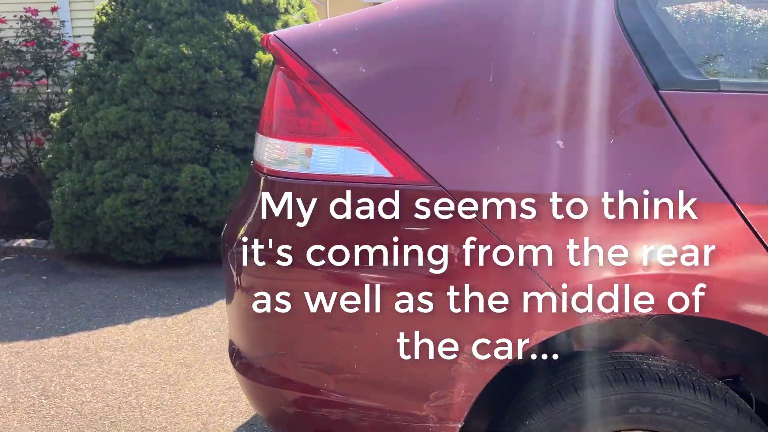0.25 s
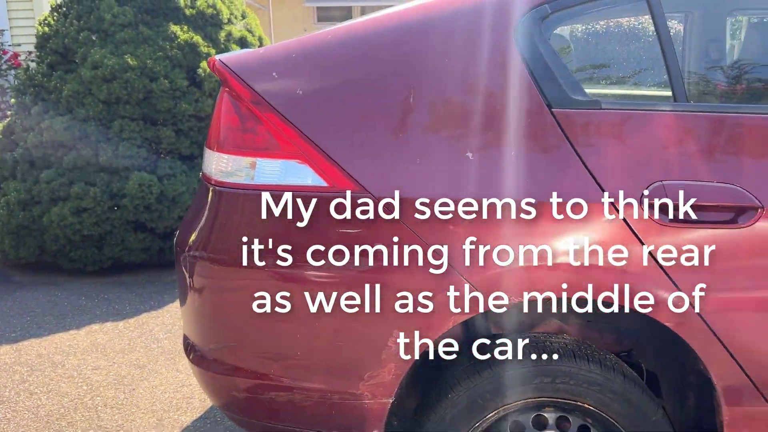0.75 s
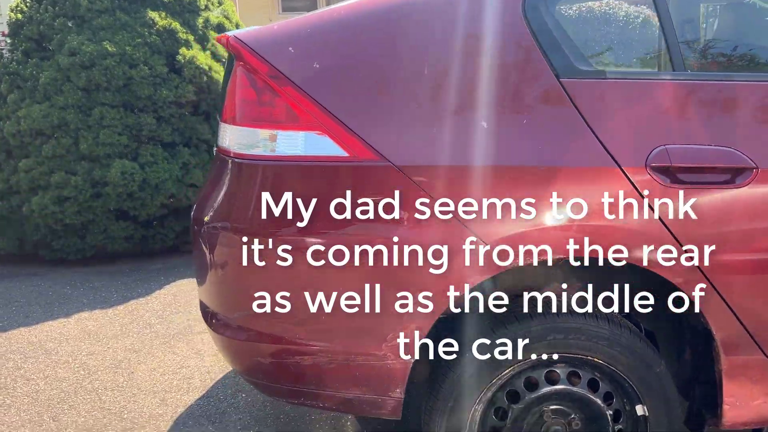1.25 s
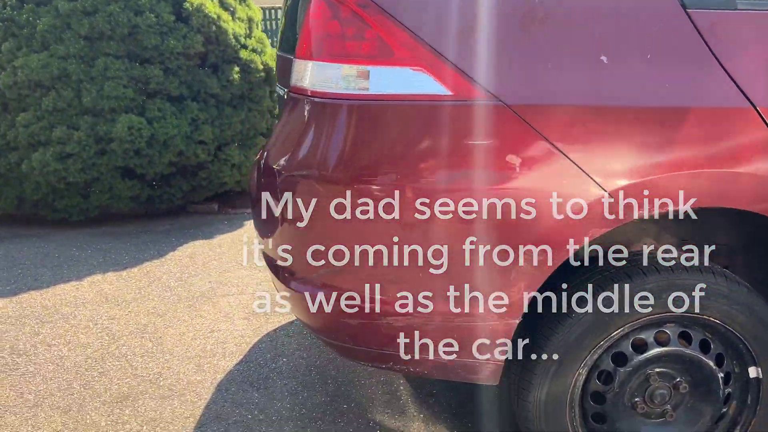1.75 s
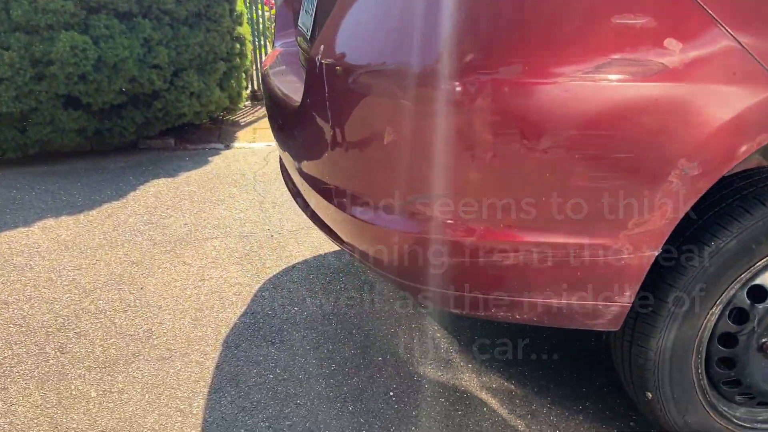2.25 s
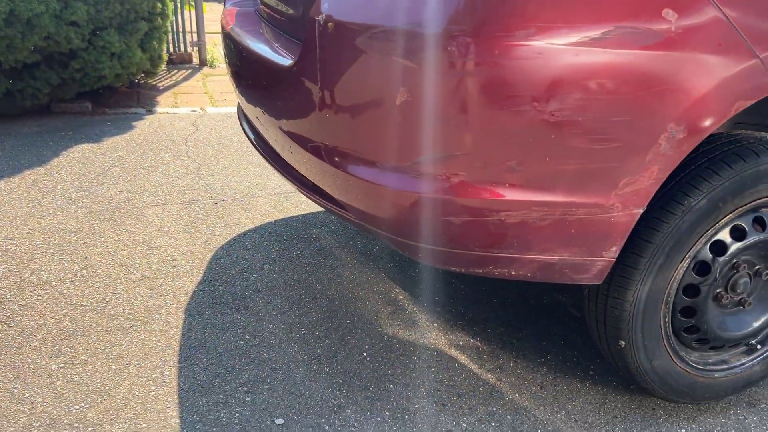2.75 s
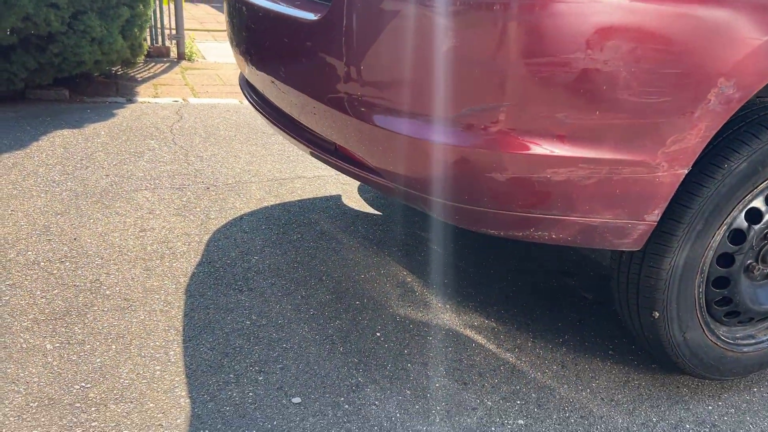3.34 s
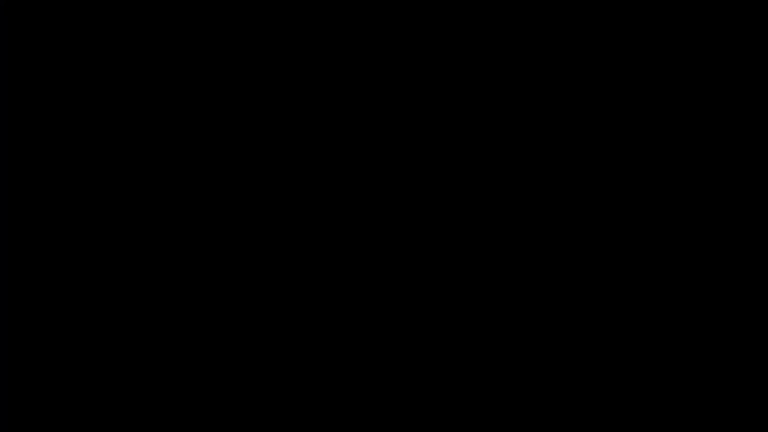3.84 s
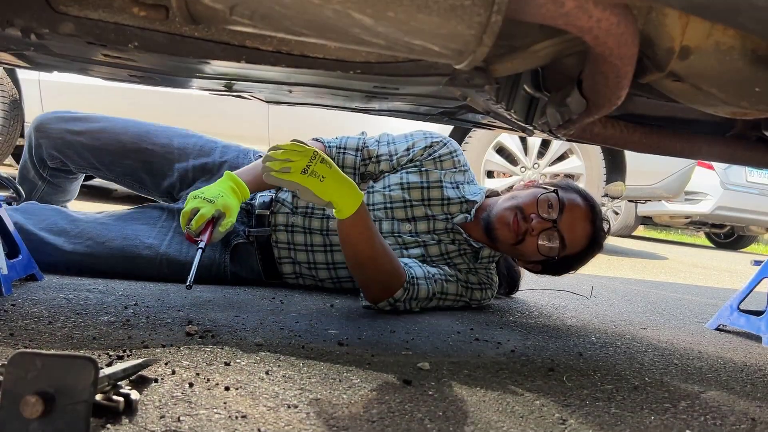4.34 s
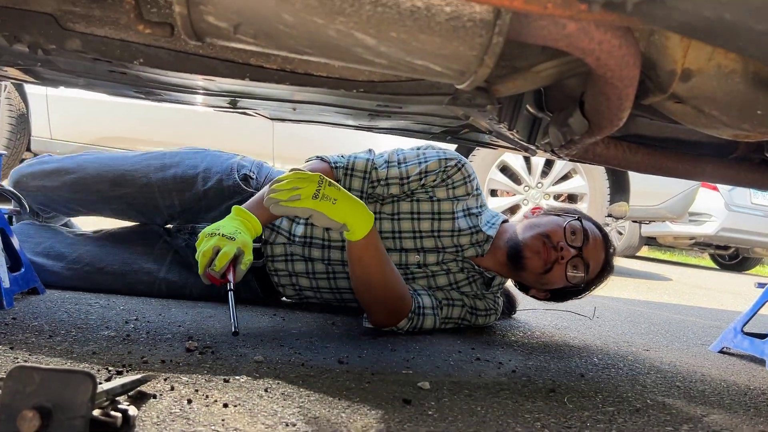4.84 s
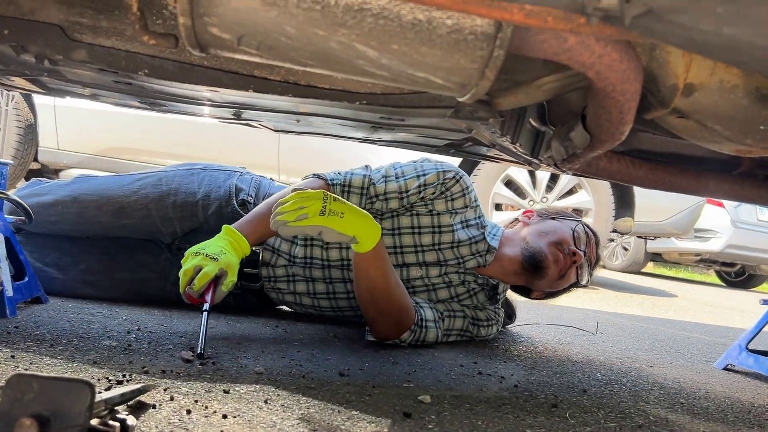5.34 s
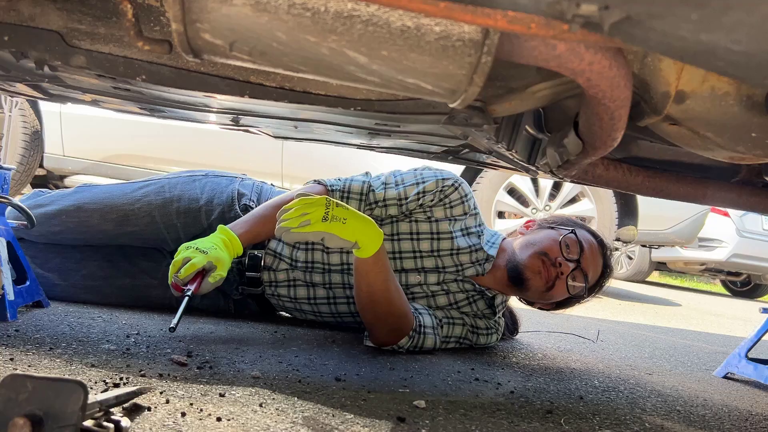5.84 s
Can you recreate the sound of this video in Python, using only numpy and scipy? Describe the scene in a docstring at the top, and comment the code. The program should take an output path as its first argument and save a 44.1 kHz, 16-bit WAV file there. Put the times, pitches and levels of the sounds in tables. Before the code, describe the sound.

A small car idles with a booming, hissing exhaust leak, fades out, then fades back in closer with a harder, ticking bark.

```python
"""First comes the round boom of a small car idling with a leaking exhaust, heard beside the rear bumper.
Every firing sends a pressure pulse down the pipe: it spits hiss and a crack through the leak, then booms
and puffs out of the tailpipe. Light wind brushes the microphone and grit scuffs on the driveway.
The listener stoops as the sound fades out; then the idle fades in from under the floor,
slower and harder, with a sharp tick on every firing."""
import sys
import numpy as np
from scipy import signal
from scipy.fft import rfft, irfft
from scipy.io import wavfile

SR = 44100
rng = np.random.default_rng(int(sys.argv[2]) if len(sys.argv) > 2 else 0)


def unload_wav(signal):
    """Save mono or channel-first audio to the path in sys.argv[1] as 16-bit WAV at rate SR, clipped to [-1, 1]."""
    wavfile.write(
        sys.argv[1],
        SR,
        np.round(np.clip(np.atleast_2d(signal).T, -1, 1) * 32767).astype(np.int16),
    )


N = 268304

# the pipe's tone from each listening place: (multiple of the firing rate, level/dB)
STANDING_PIPE = [(1, -27), (2, -0.5), (3, -0.7), (4, 3), (5, -1.5), (6, -21.5), (7, -15.5), (8, -14),
                 (9, -21.5), (10, -25), (11, -15.5), (12, -32.5), (13, -20.5), (14, -40.5), (15, -35),
                 (16, -42), (17, -39), (18, -46)]
STOOPED_PIPE = [(1, -24), (2, 2), (3, 0), (4, -2.5), (5, -1.5), (6, -30), (7, -24.5), (8, -16.5), (9, -21),
                (10, -28), (11, -14), (12, -48.5), (13, -26.5), (14, -35), (15, -24), (16, -23), (17, -35),
                (18, -24), (19, -36.5), (20, -39), (21, -38.5), (22, -35), (23, -51)]
UNDER_PIPE = [(1, -19), (2, 6), (3, 8.5), (4, -0.5), (5, 4), (6, -17.5), (7, -14.5), (8, -7), (9, -19),
              (10, -22), (11, -17), (12, -30.5), (13, -10.5), (14, -26), (15, -30.5), (16, -25.5),
              (17, -22), (18, -30), (19, -43), (20, -43.5)]
# the knock by which every other firing differs: (multiple of the firing rate, level/dB)
REAR_LOPE = [(5, -36), (7.5, -32), (9.5, -23.5), (10.5, -19.5), (11.5, -27), (12.5, -35), (14.5, -35),
             (17.5, -37), (21, -49)]
UNDER_LOPE = [(5.5, -38), (7.5, -26), (8.5, -22.5), (12.5, -24), (14.5, -29), (15.5, -37), (16.5, -35.5),
              (18, -45), (20.5, -42)]
# the four cylinders hit a little unevenly: level/dB of each
CYLINDER_DB = [-1.7, -2.1, -1.73, -2.1]
# tailpipe and underbody resonances rung by the puffs: (f/Hz, width/Hz, level/dB)
STANDING_RINGS = [(763, 115, -5.5), (906, 60, 2), (946, 23, 6), (1135, 45, -0.5), (1440, 61, -12.5),
                  (1773, 20, -6), (2025, 91, -7.5), (2550, 100, -18.5)]
STOOPED_RINGS = [(718, 75, 3.5), (937, 44, 5.5), (1121, 21, 0.5), (1260, 81, -4), (1500, 114, -4.5),
                 (1900, 190, -8.5), (2410, 150, -11.5)]
UNDER_RINGS = [(641.5, 18, 3.5), (907, 55, -8), (1254, 52, 0), (1403, 63, -7), (1608, 37, -5.5),
               (1847, 49, -5.5), (2136, 28, -3.5), (2350, 130, -11), (2650, 85, -10.5), (2870, 27, -11)]
# the gap between floor and ground throws each crack sideways: (f/Hz, width/Hz, level/dB)
GAP_RINGS = [(1140, 440, -11), (1800, 100, 9)]
# EQ curves of churning gas, leak hiss, wind and grit: (f/Hz, level/dB)
REAR_CHURN = [(40, -25), (70, -16), (150, -0.5), (220, 5.5), (380, 6), (520, 3), (750, -8), (1200, -100)]
UNDER_CHURN = [(40, -36), (70, -23), (150, -3), (250, 8.5), (400, -4.5), (550, 3.5), (750, -28),
               (1200, -73)]
REAR_HISS = [(400, -10), (900, 4), (1500, 6), (3000, 5), (4500, 0), (7000, -3), (14000, -4.5), (15800, -11)]
UNDER_HISS = [(500, -18), (1000, -2), (2400, 4.5), (4500, 0), (6500, -3), (13500, -2.5), (15800, -8)]
WIND_COLOUR = [(15, -47), (28, 13), (42, 10), (60, 21.5), (90, 17), (160, 12.5), (400, -37.5)]
SCUFF_COLOUR = [(700, -8), (1700, 3), (4200, 4), (5800, -2), (7800, 1), (13500, -9), (16000, -22)]
# buffets of wind and scuffs on the asphalt: (t/s, level/dB, rise and decay time/s)
BUFFETS = [(.21, -32, 0.03), (.37, -28, 0.098), (.61, -26.5, 0.048), (1.28, -30, 0.073), (1.44, -28, 0.036),
           (1.66, -34, 0.049), (1.9, -34, 0.14)]
SCUFFS = [(.668, -46.5, 0.039), (1.11, -45.5, 0.037), (2.781, -42, .012), (2.8005, -32.5, 0.00076),
          (2.821, -40, 0.0059), (2.8465, -34.5, 0.00064), (2.8475, -37, 0.0093), (2.863, -44, 0.012)]
# stereo image of the noise: (f/Hz, left-right correlation)
STEREO_LIKENESS = [(60, 0.85), (200, 0.95), (400, 0.35), (700, 0.11), (1300, 0.47), (2500, 0.24),
                   (6000, -0.032), (8600, 0.4), (12500, -0.022)]

# the mix at each listening place: level/dB of (boom, bark, puff, hiss)
STANDING_DB = (-19.5, -27.5, -40, -45.5)
STOOPED_DB = (-18, -26, -42.5, -46.5)
UNDER_DB = (-14.5, -23, -40, -40)
RAISED_DB_PER_HZ = (0.039, 1.6, -1.5, 0.15)   # shift of that mix per extra firing per second
STOOP_S = (1.62, 2)   # start and end of the listener's move down


def beside_bumper():
    """The exhaust near the tailpipe: round boom and soft puffs, the leak farther off."""
    stoop = ramp(*STOOP_S)
    raised_hz = 1.91 * np.exp(-(seconds() / .4702) ** 1.738)   # the engine settles from a raised speed
    firing_hz = 34.939 - .1909 * seconds() + raised_hz   # into a slowly sagging idle
    boom_db, bark_db, puff_db, hiss_db = [
        (1 - stoop) * standing_db + stoop * stooped_db + slope * raised_hz
        for standing_db, stooped_db, slope in zip(STANDING_DB, STOOPED_DB, RAISED_DB_PER_HZ)]
    clicks = firings(firing_hz, first_s=.0162, uneven_db=.35, jitter_s=.00005)
    standing_fronts = rebound(clicks, trip_s=.0052, share=.85, travel_s=.0059)
    stooped_fronts = rebound(clicks, trip_s=.0022, share=.51, travel_s=.0062)
    lope_fronts = rebound(every_other(clicks), trip_s=.007, share=.64, travel_s=.00907)
    standing = pipe_pulses(standing_fronts, STANDING_PIPE, base_hz=35.25, scatter_db=-5.5)
    stooped = pipe_pulses(stooped_fronts, STOOPED_PIPE, base_hz=34.45, scatter_db=-4)
    lope = pipe_pulses(lope_fronts, REAR_LOPE, base_hz=33.85, scatter_db=-4.5)
    pulses = (1 - stoop) * standing + stoop * stooped + lope
    note = exhaust_note(pulses, boom_db, bark_db, split_hz=162.3)
    puffing = gas_flow(clicks, rise_s=.0015, fall_s=.004, steady=1.2, steepness=2, lead_s=-.0005)
    # the churning gas is loudest in line with the tailpipe
    churn = from_db(bark_db - 9.5 - stoop) * coloured(air_noise() * puffing, REAR_CHURN)
    knocks = rms_one(delayed(clicks + .2 * every_other(clicks), lag_s=.002))
    drive = air_noise() * puffing + from_db(-5 - 4 * stoop) * knocks
    rings = (1 - stoop) * resonate(drive, STANDING_RINGS) + stoop * resonate(drive, STOOPED_RINGS)
    puffs = from_db(puff_db) * rings
    crack = from_db(-56 - 8 * stoop) * leak_cracks(clicks)
    # the leak lies upstream, so it spits just before the tailpipe puffs
    spurts = gas_flow(clicks, rise_s=.003, fall_s=.009, steady=1.1, steepness=2, lead_s=.0031)
    hiss = from_db(hiss_db) * leak_hiss(spurts, REAR_HISS, jet_hz=5500)
    return (note + churn + puffs + crack + hiss) * from_db([[.4], [-.4]])   # a touch to the left


def under_floor():
    """The exhaust near the leak: a harder bark, a sharp tick at each firing and spitting hiss."""
    boom_db, bark_db, puff_db, hiss_db = UNDER_DB
    firing_hz = 32.284 - .41 * ramp(5.094, 5.144)   # a lower idle that steps down once more
    clicks = firings(firing_hz, first_s=3.9535, uneven_db=.4, jitter_s=.00007)
    # heard from this side the pulse is inverted: a narrow bark, then a rounder thump
    fronts = -rebound(clicks, trip_s=.0101, share=.82, travel_s=.0031)
    lope_fronts = rebound(every_other(clicks), trip_s=.008, share=.6, travel_s=.009)
    pulses = pipe_pulses(fronts, UNDER_PIPE, base_hz=31.04, scatter_db=-1)
    lope = pipe_pulses(lope_fronts, UNDER_LOPE, base_hz=32, scatter_db=-2)
    note = exhaust_note(pulses + lope, boom_db, bark_db, split_hz=181)
    puffing = gas_flow(clicks, rise_s=.002, fall_s=.005, steady=.45, steepness=1)
    churn = from_db(-35.8) * coloured(air_noise() * puffing, UNDER_CHURN)
    # the pulse's steep front cracks through the hole and the gas behind it keeps the metal ringing
    snaps = leak_cracks(clicks)
    crack = from_db(-44.7) * snaps + from_db(-41) * sideways(resonate(snaps, GAP_RINGS))
    drive = air_noise() * puffing + from_db(-14) * rms_one(clicks)
    puffs = from_db(puff_db) * resonate(drive, UNDER_RINGS)
    spurts = gas_flow(clicks, rise_s=.0024, fall_s=.0024, steady=.28, steepness=4.9, lead_s=.0038)
    hiss = from_db(hiss_db) * leak_hiss(spurts, UNDER_HISS, jet_hz=4830)
    return (note + churn + crack + puffs + hiss) * from_db([[.6], [-.6]])


def firings(firing_hz, first_s, uneven_db, jitter_s):
    """The cylinders fire in turn: one click each, a little loose in time and strength."""
    count = np.cumsum(firing_hz) / SR
    count -= np.interp(first_s, seconds(), count)
    number = np.arange(np.ceil(count[0]), count[-1]).astype(int)
    late, strength = rng.standard_normal((len(number), 2)).T
    when_s = np.interp(number, count, seconds()) + jitter_s * late
    level_db = np.take(CYLINDER_DB, number, mode="wrap") + uneven_db * strength
    clicks = np.zeros(N)
    clicks[np.clip((when_s * SR).astype(int), 0, N - 1)] = from_db(level_db)
    return clicks


def every_other(clicks):
    """The lope, as firings of alternating sign: what one gains, the next one loses."""
    return clicks * (1 - 2 * (np.cumsum(clicks > 0) % 2))


def rebound(x, trip_s, share, travel_s):
    """Part of each pulse bounces to and fro in the pipe before it escapes: smeared, same colour."""
    phase_per_s = -2j * np.pi * np.arange(N + 1) * SR / (2 * N)
    trip = np.exp(phase_per_s * trip_s)
    allpass = (trip - share) / (1 - share * trip)
    return irfft(rfft(x, 2 * N) * np.exp(phase_per_s * travel_s) * allpass)[:N]


def pipe_pulses(fronts, harmonics, base_hz, scatter_db):
    """Each firing rings the pipe; body panels and ground scatter the upper part to the sides."""
    curve = [(30, -121.5)] + [(k * base_hz, db) for k, db in harmonics] + [(1000, -49), (4000, -103.5)]
    cepstrum = irfft(np.log(from_db(at_bins(curve))), N)
    cepstrum[1:N // 2] *= 2   # minimum phase: the ring follows the hit
    cepstrum[N // 2 + 1:] = 0
    ring = irfft(np.exp(rfft(cepstrum)), N)[:SR // 4]
    pulses = -signal.fftconvolve(fronts, ring)[:N]
    t = seconds()[:SR // 30]
    echoes = rng.standard_normal(len(t)) * np.exp(-t / .0014)
    scatter = signal.fftconvolve(butter(pulses, 447, "high"), echoes / np.linalg.norm(echoes))[:N]
    return pulses + from_db(scatter_db) * sideways(scatter)


def exhaust_note(pulses, boom_db, bark_db, split_hz):
    """The pipe's voice in two bands: the deep boom that spreads everywhere and the bark above it."""
    boom = signal.sosfiltfilt(signal.butter(4, split_hz, fs=SR, output="sos"), pulses)
    return from_db(boom_db) * rms_one(boom) + from_db(bark_db) * rms_one(pulses - boom)


def gas_flow(clicks, rise_s, fall_s, steady, steepness, lead_s=0):
    """Envelope of the gas: each firing surges over a steady stream, more when it hits harder; rms 1."""
    t = seconds()[:SR // 10]
    surge = (1 - np.exp(-t / rise_s)) * np.exp(-t / fall_s)
    flow = signal.fftconvolve(clicks ** steepness, surge / surge.max())[:N]
    return rms_one(delayed(flow, -lead_s) + steady)


def resonate(x, modes):
    """Metal or an air gap rings: parallel resonances of alternating sign; rms 1."""
    out = 0
    for k, (hz, width, db) in enumerate(modes):
        r = np.exp(-np.pi * width / SR)
        poles = [1, -2 * r * np.cos(2 * np.pi * hz / SR), r * r]
        out = out + (-1) ** k * from_db(db) * (1 - r * r) / 2 * signal.lfilter([1, 0, -1], poles, x)
    return rms_one(out)


def leak_hiss(flow, spectrum, jet_hz):
    """Gas jets from the hole: the top end follows each spurt, the lower rush is steadier."""
    noise = air_noise()
    rush = signal.sosfiltfilt(signal.butter(2, jet_hz, fs=SR, output="sos"), noise)
    return coloured(rush * rms_one(np.sqrt(np.abs(flow))) + (noise - rush) * flow, spectrum)


def leak_cracks(clicks):
    """Gas snaps through the hole in a quick downward chirp; the ground returns it duller; rms 1."""
    high_hz, low_hz, fall_s, length_s = 2756, 803, .002307, .0065
    spread_db, spread_octaves, jitter_s = 1, .08, .00012   # no two cracks are alike
    starts, t = np.flatnonzero(clicks), seconds()[:SR // 50]
    strength, pitch, late = rng.standard_normal((len(starts), 3)).T[:, :, None]
    age = np.clip(t - jitter_s * late, 0, length_s)
    hz = (low_hz + (high_hz - low_hz) * np.exp(-age / fall_s)) * 2 ** (spread_octaves * pitch)
    envelope = clicks[starts, None] * from_db(spread_db * strength) * np.sin(np.pi * age / length_s)
    snaps = envelope * np.sin(2 * np.pi * np.cumsum(hz, axis=1) / SR)
    positions = starts[:, None] + np.arange(len(t))
    direct = np.bincount(positions.ravel(), snaps.ravel(), N)[:N]
    ground_echo = delayed(butter(direct, 1450, "low"), lag_s=.00298)
    return rms_one(direct + from_db(-4) * ground_echo)


def wind():
    """Low lumps of wind on the microphone; the breeze eases down in the lee of the car."""
    breeze = from_db(-33.5 - 2 * ramp(*STOOP_S))
    return (breeze + swells(BUFFETS)) * coloured(air_noise(), WIND_COLOUR)


def scuff():
    """Grit crunches on the asphalt in a few quick slips."""
    grit = air_noise() * from_db(5 * np.clip(rng.standard_normal(N), -2, 2))
    return swells(SCUFFS) * coloured(grit, SCUFF_COLOUR)


def air_noise():
    """White stereo noise, centred in the bass and wide in the treble."""
    mid, side = rfft(rng.standard_normal((2, N)))
    alike = at_bins(STEREO_LIKENESS)
    return rms_one(irfft(np.sqrt(1 + alike) * mid + sideways(np.sqrt(1 - alike) * side), N))


def swells(rows):
    """Brief peaks of level with an exponential rise and fall."""
    return sum(from_db(db) * np.exp(-np.abs(seconds() - peak_s) / decay_s) for peak_s, db, decay_s in rows)


def ramp(start_s, end_s):
    """A straight fader move from 0 to 1."""
    return np.clip((seconds() - start_s) / (end_s - start_s), 0, 1)


def coloured(x, spectrum):
    """Apply an EQ curve; rms 1."""
    return rms_one(irfft(rfft(x) * from_db(at_bins(spectrum)), N))


def at_bins(points):
    """A curve over log frequency, read at every Fourier bin."""
    hz, value = np.transpose(points)
    return np.interp(np.log(np.arange(N // 2 + 1) * SR / N + 1), np.log(hz), value)


def butter(x, hz, kind):
    """Two-pole low-pass or high-pass."""
    return signal.sosfilt(signal.butter(2, hz, kind, fs=SR, output="sos"), x + 1e-18)


def delayed(x, lag_s):
    """Slide a signal in time."""
    return np.interp(seconds() - lag_s, seconds(), x)


def sideways(x):
    """Pure width: opposite polarity left and right."""
    return x * [[1], [-1]]


def from_db(db):
    """Decibels to gain."""
    return 10 ** (np.asarray(db) / 20)


def rms_one(x):
    """Scale to unit power."""
    return x / np.sqrt(np.mean(x ** 2) + 1e-20)


def seconds():
    """Time of every sample."""
    return np.arange(N) / SR


def scene():
    """The bumper perspective fades out; after a moment of silence the one under the floor fades in."""
    rear_gate = np.interp(seconds(), [0, .004, 3.89, 3.905], [0, 1, 1, 0])
    under_gate = np.interp(seconds(), [3.952, 3.955, N / SR - .004, N / SR], [0, 1, 1, 0])
    fade_out = rear_gate * (1 - ramp(.84, 3.908))
    fade_in = under_gate * ramp(3.866, 6.31)
    return fade_out * (beside_bumper() + wind() + scuff()) + fade_in * under_floor()


def record(dry):
    """The stereo microphone has one narrow treble dip in the mid, one in the side and a steep top cut."""
    mid_dip_hz, side_dip_hz, dip_q, cutoff_hz = 10080, 13450, 5.5, 15650
    mid = signal.filtfilt(*signal.iirnotch(mid_dip_hz, dip_q, fs=SR), (dry[0] + dry[1]) / 2)
    side = signal.filtfilt(*signal.iirnotch(side_dip_hz, dip_q, fs=SR), (dry[0] - dry[1]) / 2)
    top_cut = signal.ellip(10, .05, 70, cutoff_hz, fs=SR, output="sos")
    return signal.sosfiltfilt(top_cut, mid + sideways(side))


dry = scene()
out = record(dry)
unload_wav(out)
```